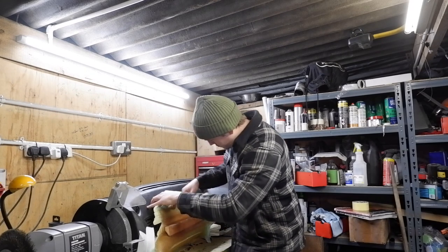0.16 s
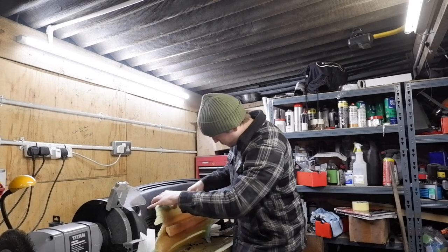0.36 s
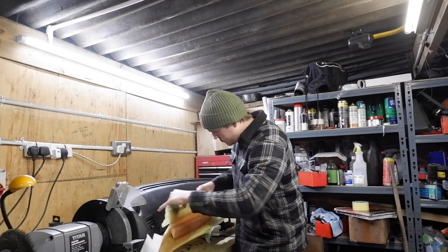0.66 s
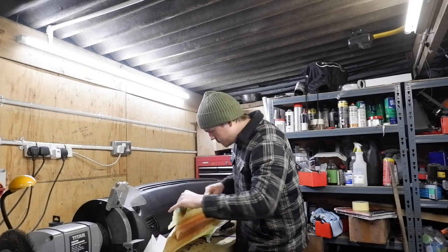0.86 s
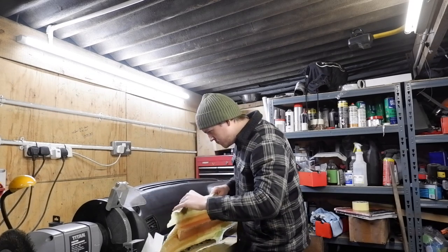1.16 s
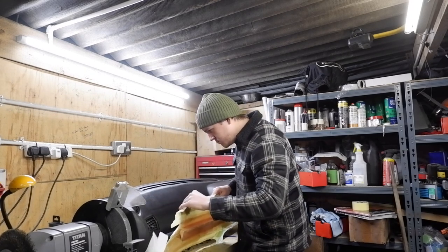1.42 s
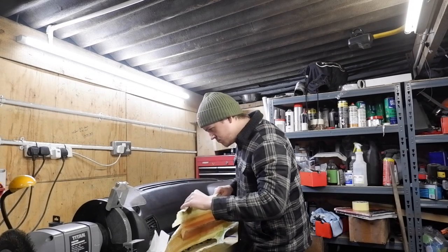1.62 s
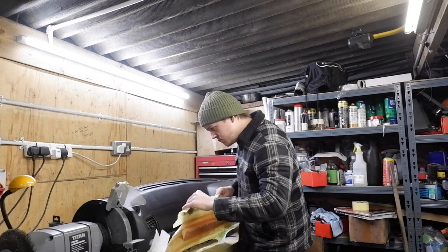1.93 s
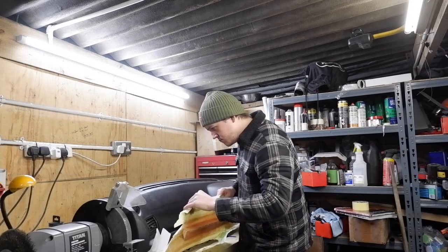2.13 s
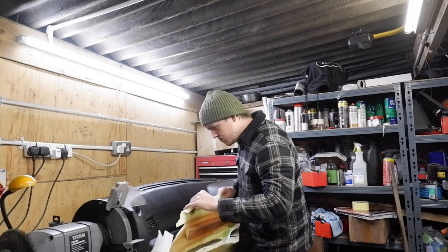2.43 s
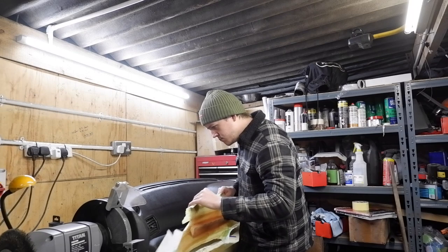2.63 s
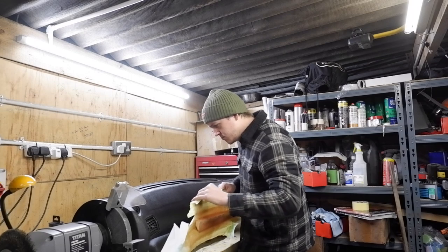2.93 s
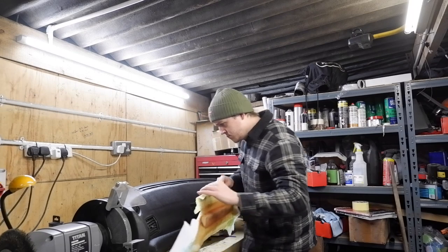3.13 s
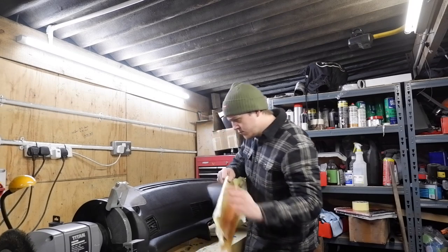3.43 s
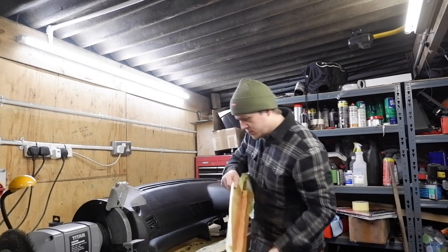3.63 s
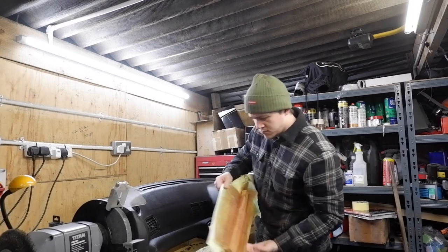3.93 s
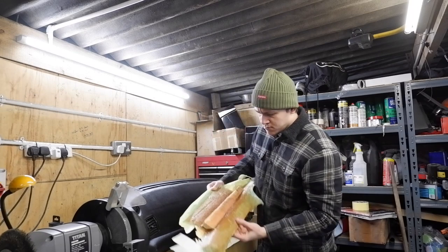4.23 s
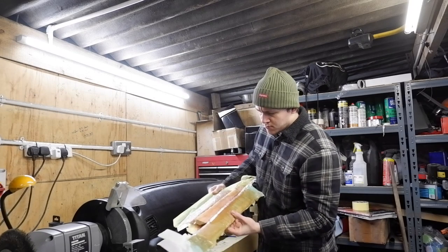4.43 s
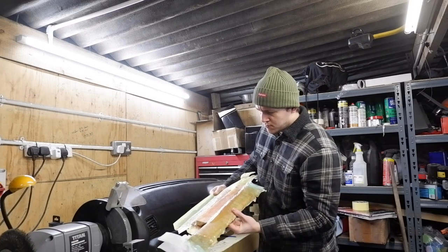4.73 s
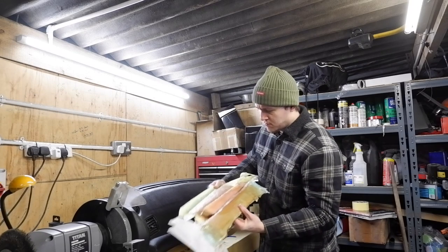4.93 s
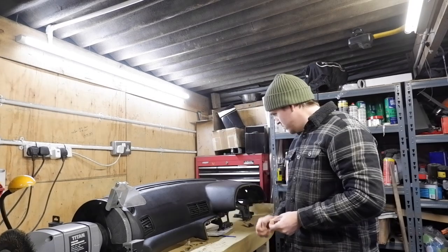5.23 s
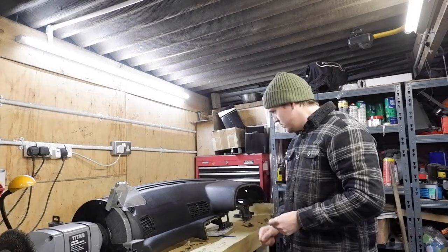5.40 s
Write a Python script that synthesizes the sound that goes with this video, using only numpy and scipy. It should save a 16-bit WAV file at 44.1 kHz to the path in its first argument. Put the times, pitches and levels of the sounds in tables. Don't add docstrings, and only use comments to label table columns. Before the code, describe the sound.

Irregular crackling and brittle snapping as a hard moulded layer peels from plastic, bursting into loud cracks, then fading to faint hiss.

```python
import sys
import numpy as np
from scipy import signal
from scipy.io import wavfile
from scipy.ndimage import uniform_filter1d

SR = 44100
rng = np.random.default_rng(int(sys.argv[2]) if len(sys.argv) > 2 else 0)


def level_to_linear(level):
    exponent = np.asarray(level, float) / 20
    return 10 ** exponent


def transcribe(u):
    v = np.clip(np.atleast_2d(u).T, -1, 1)
    q = np.round(v * 32767).astype(np.int16)
    wavfile.write(sys.argv[1], SR, q)


N = 245195

# pitch_hz, width_hz, level_db
CAVITY_MODES = [(402.3, 100.3, 5), (551.9, 92.3, 4), (734.5, 251, 9), (472.8, 81, -7), (289.5, 93, -2.5),
                (202.5, 19.9, -14.5)]
# pitch_hz, width_hz, level_db
SHELL_MODES = [(1127, 333, 2), (1517, 322, 4), (1953, 976, 10), (2600, 1230, 12.5), (3740, 1277, 7.5)]


def evened(x):
    return x / np.sqrt(np.mean(x ** 2) + 1e-20)


def read(points, hz):
    point_hz, value = np.transpose(points)
    return np.interp(np.log(hz + 1), np.log(point_hz + 1), value)


def ring(modes, low_hz, rise_s):
    t = np.arange(3000) / SR
    out = np.zeros(len(t))
    for hz, width_hz, db in modes:
        out += level_to_linear(db) * np.exp(-np.pi * width_hz * t) * np.sin(2 * np.pi * hz * t)
    no_bass = signal.butter(3, low_hz, "high", fs=SR, output="sos")
    out = signal.sosfilt(no_bass, out * (1 - np.exp(-t / rise_s)))
    return out / abs(out).max()


def edge():
    # pitch_hz, level_db
    fizz_colour = [(800, -71.5), (3000, -2), (5000, 2.5), (7500, 3.5), (10000, 0), (13000, -3.5),
                   (15800, -6.5), (17500, -27)]
    hz = abs(np.fft.fftfreq(1024, 1 / SR))
    log_gain = np.log(level_to_linear(read(fizz_colour, hz)))
    out = np.fft.ifft(np.exp(np.conj(signal.hilbert(log_gain)))).real[:512]
    return out / abs(out).max()


def snaps():
    # peak_s, peak_db, patch_pitch_hz, knock_db, edge_db
    deep_snaps = [
        (3.5132, -34, 1370, -32, -48.5),
        (3.6252, -33.5, 2710, -48.5, -49),
    ]
    low_snaps = [(.2949, -24, 3470, -44, -15.5), (1.1857, -36, 1920, -40.5, -35),
                 (1.2035, -37.5, 2790, -38, -43), (1.2238, -31.5, 2830, -43.5, -49.5),
                 (1.2696, -33.5, 1990, -38.5, -45.5), (1.4666, -24, 2330, -34.5, -28.5),
                 (1.5341, -24, 2400, -40, -42.5), (1.6301, -36, 2460, -44, -34),
                 (1.964, -35.5, 2360, -46.5, -40), (2.0111, -33, 1860, -45.5, -38),
                 (2.1017, -32, 2070, -41.5, -35.5), (2.311, -24, 2020, -34, -25),
                 (2.342, -8, 3300, -31, -18), (2.3519, -18, 2090, -36.5, -44),
                 (2.3679, -29.5, 1260, -26.5, -38.5), (2.3825, -19, 2480, -28, -27),
                 (2.5956, -33, 1440, -35, -30), (2.6181, -38, 1530, -34, -39),
                 (2.7637, -41, 1090, -31, -44.5), (3.4214, -39, 2140, -39, -45.5),
                 (3.9892, -35, 3270, -43, -26), (4.3813, -39.5, 1400, -37, -46.5),
                 (4.8641, -29, 2200, -36, -31)]
    mid_snaps = [(.4205, -37, 1100, -38.5, -46.5), (.5298, -34, 3290, -32, -51.5),
                 (.571, -29, 2780, -46, -30), (.6644, -31.5, 1600, -40, -29),
                 (.8698, -6.5, 1800, -20, -19.5), (.9489, -23.5, 1150, -32.5, -19.5),
                 (.9529, -29, 2290, -32.5, -21.5), (1.0141, -25, 1500, -43.5, -34.5),
                 (1.0252, -18, 1550, -35, -25.5), (1.0355, -26, 2090, -27.5, -21.5),
                 (2.298, -36, 1900, -35, -33.5), (3.1143, -31.5, 3670, -40, -34.5),
                 (3.3398, -40.5, 1000, -37.5, -41.5), (3.5299, -36.5, 1430, -30.5, -51.5),
                 (3.7306, -49.5, 1430, -45.5, -38), (4.1277, -25, 2240, -32.5, -7.5),
                 (4.132, -24, 3930, -26.5, -17)]
    high_snaps = [(.1824, -29.5, 1220, -41.5, -39), (.2355, -30, 1390, -34.5, -36.5),
                  (.2468, -25, 3800, -45, -32.5), (.25, -17.5, 3600, -30.5, -31),
                  (.6342, -32.5, 2340, -44, -21), (.689, -13.5, 1543, -31.5, -26),
                  (.9995, -19, 1690, -31, -30.5), (1.0505, -25, 1610, -33, -31),
                  (1.0566, -22.5, 1320, -29, -34), (1.0969, -29, 1660, -36.5, -36.5),
                  (2.6807, -25, 1200, -29, -38.5), (2.8183, -43, 1060, -47, -45),
                  (3.175, -46.5, 1040, -46, -47.5), (4.0919, -14, 2300, -29, 0.),
                  (4.1078, -17, 2190, -38.5, -9), (4.1185, -26, 2320, -29, -6.5),
                  (4.1236, -14, 2080, -35, -10.5)]
    # peak_s, peak_db, patch_pitch_hz, edge_db
    rim_ticks = [(.3014, -28, 3300, -23), (0.3313, -32, 2500, -32.5), (.5629, -28, 1684, -35.5),
                 (.7906, -35, 1450, -43.5), (0.8347, -37.5, 2920, -28), (1.0641, -23.5, 1250, -36),
                 (1.0736, -45, 1580, -28), (1.1034, -41.5, 2270, -29), (1.2486, -39, 4120, -34.5),
                 (1.506, -26.5, 2380, -26.5), (1.5091, -21.5, 2370, -19), (1.71, -40.5, 3620, -35),
                 (1.8095, -42, 2315, -36.5), (1.9423, -38.5, 2080, -52.5), (1.9762, -42, 4240, -43),
                 (2.2325, -28, 2000, -25), (2.2292, -36, 2400, -28), (2.6924, -30.5, 2180, -59),
                 (3.3724, -34.5, 1960, -41), (3.5551, -31, 1520, -44.5), (3.7946, -44, 3960, -38.5),
                 (4.0661, -40.5, 4140, -33.5), (4.8466, -36, 2300, -30.5), (4.8475, -35.5, 3600, -34.5),
                 (1.847, -43.5, 1000, -55.5)]
    rim_knock_db, rim_knock_hz = -52.5, 398
    panels = [(deep_snaps, 275.6), (low_snaps, 398), (mid_snaps, 577.5), (high_snaps, 805.7)]
    bonds = [(*row, knock_hz) for rows, knock_hz in panels for row in rows]
    rim = [(s, db, hz, rim_knock_db, edge_db, rim_knock_hz) for s, db, hz, edge_db in rim_ticks]
    return bonds + rim


def cracks(cycles=0.48, patch_db=2.4, knock_db=-9, edge_db=1.5, shell_db=-16,
           grit_db=-22, lead_db=-4, trail_s=0.00548):
    out, t = np.zeros(N + 6000), np.arange(3000) / SR
    hollow = ring(CAVITY_MODES, 122, 0.00227)
    shell = ring(SHELL_MODES, 600, 0.0001)
    sharp = np.pad(edge(), (46, 2442))
    bonds = snaps()
    splinters = rng.standard_normal((len(bonds), 3000)) * (rng.random((len(bonds), 3000)) < 0.25)
    for (s, db, hz, low_db, high_db, low_hz), grit in zip(bonds, splinters):
        turn = (t - 50 / SR) * hz
        patch = np.exp(-(turn / cycles) ** 2) * np.cos(2 * np.pi * turn)
        body = level_to_linear(db + patch_db) * (patch - patch.mean() + level_to_linear(shell_db) * shell)
        body += level_to_linear(high_db + edge_db) * sharp
        knock = ring([(low_hz, 110, 0)], 151, 0.0054) + level_to_linear(-4.0) * hollow

        drive = level_to_linear(grit_db) * grit * np.exp(-t / trail_s)
        drive[:30] *= level_to_linear(lead_db)
        drive[30] = 1
        part = out[round(s * SR) - 80:][:5999]
        part += signal.fftconvolve(drive, body + level_to_linear(low_db + knock_db) * knock)
    return out[:N]


def effort(rows, sudden=False):
    s, span_s, *levels_db = np.transpose(rows)[:, :, None]
    roundness, burst_rise_s = 1.369, 0.0012
    times = np.arange(0, N / SR + 0.01, 0.001)
    late = times - s
    if sudden:
        fall = np.where(late < 0, -late / burst_rise_s, late / span_s)
    else:
        fall = abs(late / span_s) ** roundness
    pulls = level_to_linear(np.array(levels_db) - 20 * np.minimum(fall, 10))
    gain = np.sqrt((pulls ** 2).sum(axis=1))
    return np.array([np.interp(np.arange(N) / SR, times, g) for g in gain])


def grains(body, per_s, spread_db):
    size = level_to_linear(spread_db * np.minimum(rng.exponential(1, N), 3.2)) * rng.choice([-1., 1.], N)
    hits = size * (rng.random(N) < per_s / SR)
    return evened(signal.oaconvolve(hits, body)[:N])


def crackle():
    # peak_s, time_to_fall_20_db_s (either side), peel_db, flex_db, fizz_db
    swells = [(0., 0.1637, -51, -47, -56.5), (.22, 0.1464, -40, -47.5, -44),
              (.251, 0.0151, -27.5, -34, -35.5), (.268, 0.0386, -37, -42, -39),
              (.566, 0.0557, -41.5, -45.5, -42), (.8, 0.2445, -45.5, -49.5, -49.5),
              (.92, 0.065, -42, -44.5, -44.5), (1.044, 0.0589, -31.5, -38.5, -40),
              (1.2, 0.2676, -47, -47, -47.5), (1.39, 0.0973, -52, -47, -52), (1.53, 0.102, -38, -43, -42.5),
              (1.99, 0.07, -64.5, -53.5, -58), (2.322, 0.047, -38.5, -39, -40),
              (2.4, 0.11, -35.5, -38.5, -39), (2.65, 0.0468, -43.5, -38, -46.5),
              (2.92, 0.34, -53, -57.5, -56.5), (3.054, 0.0438, -49, -52.5, -47.5),
              (3.375, 0.0442, -40, -40.5, -45), (3.36, 0.2, -49, -45.5, -51.5),
              (3.76, 0.5656, -51.5, -48, -54.5), (3.993, 0.0208, -44.5, -48.5, -39),
              (4.116, 0.0051, -19, -24.5, -18.5), (4.13, 0.022, -21.5, -35, -15.5),
              (4.99, 0.0731, -56.5, -54.5, -61), (5.46, 0.02, -64.5, -64.5, -58)]
    # start_s, time_to_fall_20_db_s, peel_db, flex_db, fizz_db
    bursts = [(.296, 0.0621, -39, -44, -33), (.42, 0.0974, -45.5, -43.5, -47.5),
              (.525, 0.1, -44.5, -40.5, -48), (.634, 0.0671, -35, -50.5, -44),
              (.69, 0.0082, -21, -44.5, -35.5), (.871, 0.0275, -33.5, -26, -35),
              (.948, 0.023, -26, -31.5, -28), (1.468, 0.18, -42.5, -39, -47),
              (2.102, 0.0228, -46.5, -53, -44.5), (2.229, .045, -40, -59.5, -33.5),
              (2.345, 0.05, -31, -31, -27.5), (2.59, 0.0816, -41, -42, -43),
              (3.116, 0.0262, -35.5, -41, -44), (3.513, 0.1332, -35.5, -40, -47),
              (3.986, 0.0647, -40.5, -47, -40), (4.093, .035, -23.5, -37, -19), (4.108, .05, -26, -33, -22),
              (4.145, 0.2282, -41, -46.5, -37.5), (4.14, .05, -32, -42, -27), (.943, .02, -40, -50, -40),
              (3.58, .05, -55, -60, -46), (4.31, .6, -49, -48, -53.5), (4.846, .04, -42, -54, -39),
              (4.838, .03, -52, -55, -46), (4.866, 0.04, -45, -43, -49), (4.03, 0.4371, -48.5, -46.5, -54),
              (1.07, 0.1161, -40, -44, -45), (2.18, 0.03, -51, -49.5, -63.5),
              (2.68, 0.0512, -37.5, -42, -41)]
    peel, flex, fizz = np.hypot(effort(swells), effort(bursts, sudden=True))
    out = level_to_linear(-5.0) * peel * grains(ring(SHELL_MODES, 762, 0.0001), 2600, 2.82)
    out += level_to_linear(-7.0) * flex * grains(ring(CAVITY_MODES, 139, 0.00083), 900, 2.33)
    return out + level_to_linear(-5.0) * fizz * grains(edge(), 5000, 3.57)


def squeaks():
    # start_s, length_s, pitch_hz, sharpness (pitch over width), level_db
    slips = [(0.19, 0.0182, 1217, 4, -47), (0.422, 0.024, 4450, 25, -52), (.244, .014, 4000, 2, -37),
             (.525, 0.028, 3660, 28, -42.5), (0.529, 0.051, 920, 2.14, -46.5),
             (0.873, 0.0143, 7500, 9, -53.5), (1.18, 0.0404, 2600, 2.94, -46),
             (1.192, 0.0388, 390.5, 11.6, -46.5), (1.243, 0.017, 5050, 10, -50.5),
             (1.625, 0.03, 2450, 9, -54), (1.961, 0.069, 4955, 8.9, -57.5), (1.965, 0.087, 2140, 2.9, -57),
             (2.311, 0.11, 403, 5.9, -47.5), (2.634, 0.0692, 389, 8.4, -48),
             (2.59, 0.01986, 398, 5.1, -44.5), (2.68, 0.018, 760, 9, -40.5), (2.772, 0.034, 7770, 7, -57),
             (3.318, 0.045, 598, 2, -49), (3.353, 0.0276, 4550, 3.8, -47.5),
             (3.517, 0.0381, 2600, 4.7, -46), (4.065, .014, 4650, 2.9, -48.5),
             (4.121, 0.0159, 6580, 1.88, -21), (4.597, 0.565, 1424, 42, -72.5),
             (.871, 0.02, 1000, 1.5, -38), (3.53, 0.04, 1300, 1.5, -47)]
    out = np.zeros(N)
    noises = rng.standard_normal((len(slips), SR * 2 // 3))
    for (s, length_s, hz, q, db), noise in zip(slips, noises):
        band = signal.lfilter(*signal.iirpeak(hz, q, SR), noise)
        band = signal.lfilter(*signal.iirpeak(hz, q / 2, SR), band)
        band = band[-round(length_s * SR):]
        fade = signal.windows.tukey(len(band), 0.5)
        out[round(s * SR):][:len(band)] += level_to_linear(db) * evened(band) * fade
    return out


def pings(rise_s=0.0004, rise_cycles=0.36, fall_s=0.00061, fall_cycles=0.736, level_db=-2.5):
    # peak_s, peak_db, pitch_hz
    patches_and_knocks = [(0.7021, -23.5, 1246), (1.7115, -42, 955), (2.2292, -36.5, 1740), (2.6835, -27, 806),
                          (2.6863, -28.5, 816), (2.8995, -40.5, 2540), (3.5166, -30, 1183),
                          (3.9856, -34.5, 2100), (3.9912, -35, 1495), (4.0938, -16, 1894), (4.1651, -27.5, 3190),
                          (4.341, -41.5, 1420), (4.453, -42.5, 1540), (0.2556, -26.5, 3640),
                          (.6147, -42.5, 8480), (0.7606, -39, 6950), (.8195, -35, 7080), (0.8863, -30.5, 7340),
                          (1.0073, -31.5, 8230), (1.4137, -39.5, 8310), (1.5338, -30.5, 4200),
                          (2.6857, -35.5, 8410), (2.7932, -43, 7640), (3.3616, -34.5, 4600),
                          (3.5795, -36.5, 6680), (.1937, -39.5, 670), (0.2721, -35, 474), (.5547, -34.5, 410),
                          (1.0039, -33.5, 880), (1.0968, -37.5, 560), (1.3638, -39.5, 390), (1.412, -41, 495),
                          (1.4684, -32.5, 430), (1.4795, -34, 330), (1.5925, -39, 495), (2.3675, -26.5, 450),
                          (2.3842, -27.5, 754), (2.397, -30, 400), (2.4115, -30.5, 770), (2.4533, -36.5, 560),
                          (2.6203, -35, 585), (2.6385, -32.5, 399), (2.658, -35.5, 560), (2.768, -32, 470),
                          (3.4247, -40, 452), (3.5318, -32.5, 474), (3.5476, -38, 560), (4.8674, -33.5, 646),
                          (.2475, -24, 1304), (.2515, -25, 900), (4.0667, -36.5, 4300), (4.1407, -18, 1700),
                          (0.8763, -18.5, 1096), (0.9546, -21, 1100), (0.9593, -20, 1400), (1.5188, -31, 2800),
                          (1.529, -30, 2600), (.545, -29.5, 3700), (.586, -39, 1200),
                          (.1815, -31, 1100), (.1855, -30, 1250), (.189, -34, 1150), (4.129, -27, 400),
             (4.12, -17, 1900), (4.1285, -12.5, 2200), (4.134, -21, 1500), (3.99, -40, 430),
             (4.322, -41, 420), (.39, -46, 72), (2.37, -36, 270), (2.42, -38, 230), (4.62, -46, 580),
             (.737, -36, 800), (2.2985, -36, 560), (2.299, -38, 5100), (2.3525, -22, 2500),
             (2.356, -25, 1200), (2.4045, -29, 1300), (2.44, -34, 1600), (2.466, -36, 1100),
             (.8718, -22, 1100), (.8795, -22, 800), (.884, -30, 1750), (1.039, -22, 900), (.964, -24, 1200),
             (.97, -27, 1000), (1.0445, -24, 1250), (1.1025, -29, 1500), (1.1065, -30, 1700),
             (.6545, -31, 1200), (.6915, -21, 1000), (3.5555, -31, 1400), (3.541, -31, 1500)]
    panel_flicks = [(.1821, -38, 2960), (.2095, -37, 2100), (.2355, -34, 2960), (.3532, -41, 1100),
                    (.5478, -35, 1100), (.5572, -33, 1100), (.9259, -39, 575), (.9623, -32, 575),
                    (.9488, -26, 4300), (1.0167, -37, 800), (1.0381, -30, 4200), (1.0506, -35, 5900),
                    (1.0641, -27, 1100), (1.4687, -39, 800), (1.5091, -31, 1530), (1.518, -35, 1100),
                    (2.3417, -23, 8400), (2.3437, -25, 1200), (2.405, -34, 2100), (2.4519, -34, 1530),
                    (2.6195, -38, 800), (2.6664, -41, 2100), (3.515, -37, 800), (4.1087, -22, 2100),
                    (4.1092, -24, 1090), (4.1226, -28, 575), (4.1356, -28, 575), (4.1416, -30, 575),
                    (4.125, -17, 1555), (4.8725, -38, 900), (4.8475, -36, 2100), (4.852, -40, 8300),
                    (4.13, -44, 110), (3.527, -35, 2500), (3.545, -35, 3300), (3.52, -36, 3200),
                    (2.3532, -34, 280), (.8702, -22, 3300), (.6895, -28, 3800), (4.099, -31, 580),
                    (2.346, -26, 1550)]
    free = patches_and_knocks
    phases = np.append(rng.random(len(free)), np.zeros(len(panel_flicks)))
    out, t = np.zeros(N + 3000), np.arange(-600, 3000) / SR
    for (s, db, hz), phase in zip(free + panel_flicks, phases):
        rise = np.exp(-(t / (rise_s + rise_cycles / hz)) ** 2)
        fall = np.exp(-t / (fall_s + fall_cycles / hz))
        swing = np.where(t < 0, rise, fall) * np.cos(2 * np.pi * (hz * t + phase))
        out[round(s * SR) - 600:][:3600] += level_to_linear(db + level_db) * swing
    return out[:N]


def panel(x):
    # pitch_hz, width_hz, lift_db
    panel_modes = [(392, 50, 1.5), (480, 60, -2.5), (578, 45, 3.5), (690, 70, -1.5), (810, 55, 2.5),
                   (945, 90, -5), (1085, 70, 3), (1290, 60, -1.5), (1410, 90, -5), (1555, 90, 3),
                   (1690, 70, -3), (2080, 70, .8)]
    for hz, width_hz, db in panel_modes:
        x = x + (level_to_linear(db) - 1) * signal.lfilter(*signal.iirpeak(hz, hz / width_hz, SR), x)
    return x


def garage(x, near_db=-5, far_db=-9, apart_db=-20):
    # pitch_hz, time_to_fall_60_db_s
    wall_echo = [(250, 0.503), (700, 0.226), (1700, 0.2444), (4600, 0.323), (10000, 0.211), (15000, 0.101)]
    near_t60_s = 0.0341
    size = SR // 2
    taps = np.zeros((4, size))
    slots = np.arange(60, size - 20, 12)
    at = slots + rng.integers(0, 12, (4, len(slots)))
    np.put_along_axis(taps, at, rng.choice([-1., 1.], at.shape), 1)
    near = taps * level_to_linear(-60 * np.arange(size) / SR / near_t60_s)

    hz, t, z = signal.stft(taps[::-1], SR, nperseg=256)
    fading = level_to_linear(-60 * t / read(wall_echo, hz)[:, None]) * (t > 0.01)
    far = signal.istft(z * fading, SR, nperseg=256)[1][:, :size]
    tails = level_to_linear(near_db) * near / np.linalg.norm(near[0]) + level_to_linear(far_db) * far / np.linalg.norm(far[0])

    turn = 2 * np.pi * (np.arange(N) * 5.3 / SR + np.arange(3)[:, None] / 3)
    sent = x * np.cos(turn) * np.sqrt(2 / 3)
    mid = x + signal.fftconvolve(sent, tails[:3], axes=1).sum(0)[:N]
    bright = np.diff(uniform_filter1d(x, size=2), prepend=0) + 0.4 * x
    side = level_to_linear(apart_db) * signal.fftconvolve(bright, tails[3])[:N]
    return np.array([mid + side, mid - side])


def rumble(apart_db=-13):
    # peak_s, time_to_fall_20_db_s (either side), level_db
    shifts = [
        (.33, 0.56, -56),
        (.7, 0.27, -57.5),
        (.9, 0.12, -51),
        (1.05, 0.15, -51.5),
        (2.38, 0.2149, -53),
        (2.75, 0.29, -61.5),
        (3.41, .5, -63.5),
        (4.13, -0.01, -46.5),
        (5.27, .5, -61.5),
    ]
    steady_db = -67
    dull = signal.butter(2, [110, 230], "band", fs=SR, output="sos")
    mid, side = signal.sosfilt(dull, rng.standard_normal((2, N)))
    side = level_to_linear(apart_db) * side
    level = np.hypot(level_to_linear(steady_db), effort(shifts))
    return level * evened(np.array([mid + side, mid - side]))


def floor(patchy_db=-0.69):
    # pitch_hz, level_db (per Hz)
    hiss_colour = [(12, -37.5), (20, 4.5), (44, -8.5), (169, -1), (416, -3), (670, -6), (1320, -10),
                   (1430, -9), (1600, -11), (3060, -13), (15800, -15), (17500, -22.5)]
    # pitch_hz, likeness (0 to 1)
    likeness = [(25, .5), (60, 0.75), (180, 0.964), (550, 0.55), (1650, 0.392), (4970, 0.027),
                (15000, 0.015)]
    frames, hz = N // 256 + 5, np.fft.rfftfreq(1024, 1 / SR)
    a, b, c, d, patches = rng.standard_normal((frames, 513, 5)).T
    patches = uniform_filter1d(patches, 12, 0)
    patches = evened(uniform_filter1d(patches, 14, 1))
    same = np.clip(read(likeness, hz), 0, 1)[:, None]
    mid = np.sqrt(1 + same) * (a + 1j * b)
    side = np.sqrt(1 - same) * (c + 1j * d)
    colour = level_to_linear(read(hiss_colour, hz)[:, None] + patchy_db * patches)
    z = np.array([mid + side, mid - side]) * colour
    return level_to_linear(-53) * evened(signal.istft(z, nperseg=1024, noverlap=768)[1][:, :N])


def scene():
    shell = cracks() + crackle() + squeaks()
    small = signal.sosfilt(signal.butter(2, 190, "high", fs=SR, output="sos"), shell)
    return garage(panel(small + pings())) + rumble() + floor()


def starve(x):
    # start_s, length_s, above_hz, level_db
    dips = [
        (.617, .014, 5000, -8),
        (.678, .009, 7500, -20),
        (.934, .01, 5000, -12),
        (2.213, .0145, 1500, -30),
        (2.32, .019, 12500, -30),
        (2.35, .05, 14000, -8),
        (4.076, .014, 5000, -9),
        (4.143, .11, 14300, -12),
    ]
    out = x.copy()
    for s, length_s, hz, db in dips:
        at, fade = round(s * SR), signal.windows.tukey(round(length_s * SR), 0.25)
        part = out[:, at:at + len(fade)]
        treble = signal.sosfiltfilt(signal.butter(6, hz, "high", fs=SR, output="sos"), part)
        part -= (1 - level_to_linear(db)) * fade * treble
    return out


def top_cut(x):
    return signal.sosfilt(signal.butter(12, 15830, fs=SR, output="sos"), x)


def record(dry):
    low_pass = signal.firwin(255, 16700, window=("kaiser", 9), fs=SR)
    mix = starve(signal.oaconvolve(dry, low_pass[None], "same"))
    return top_cut(mix)


dry = scene()
out = record(dry)
transcribe(out)
```